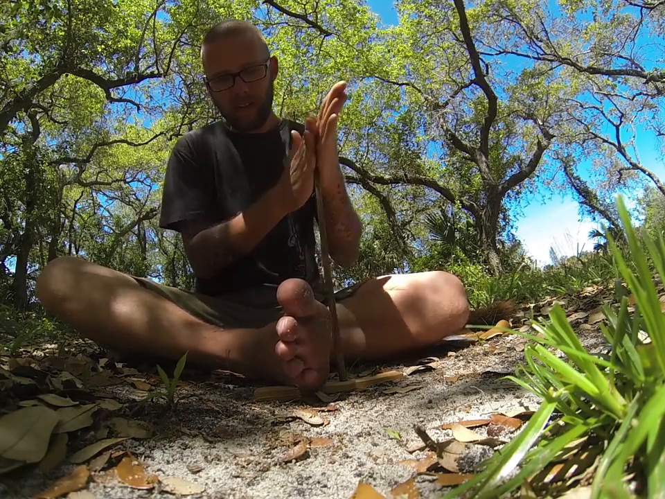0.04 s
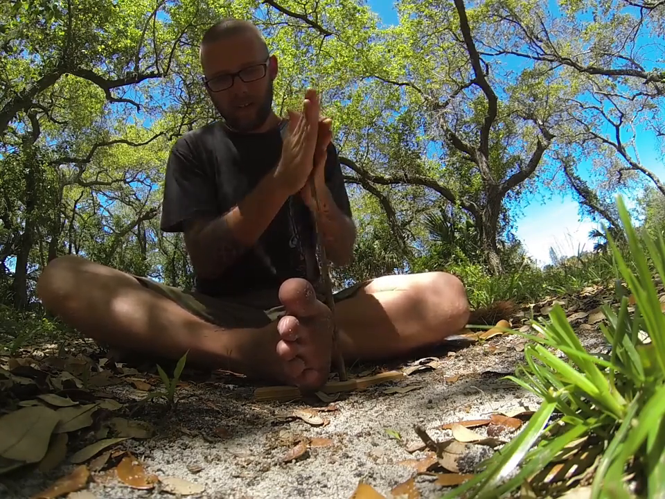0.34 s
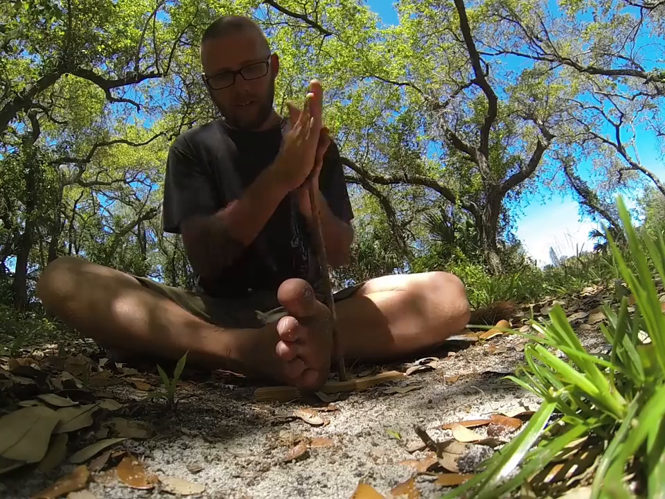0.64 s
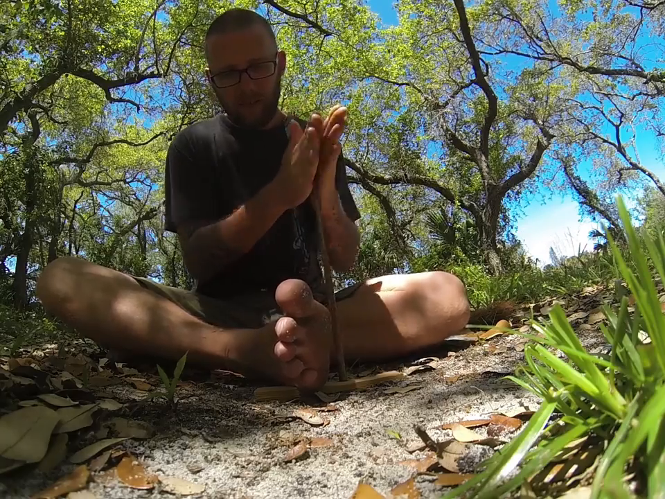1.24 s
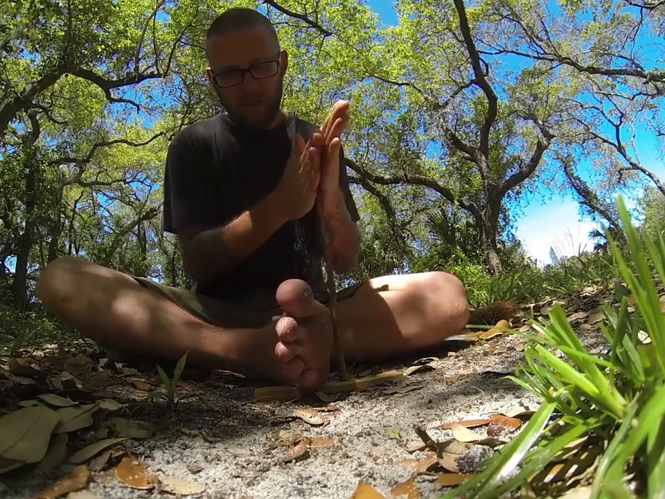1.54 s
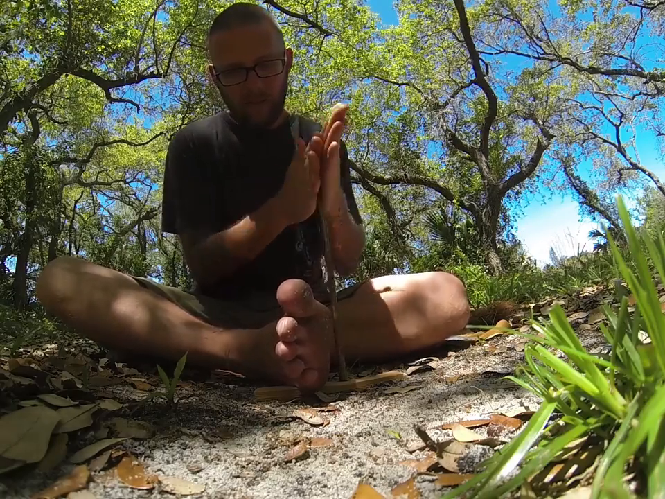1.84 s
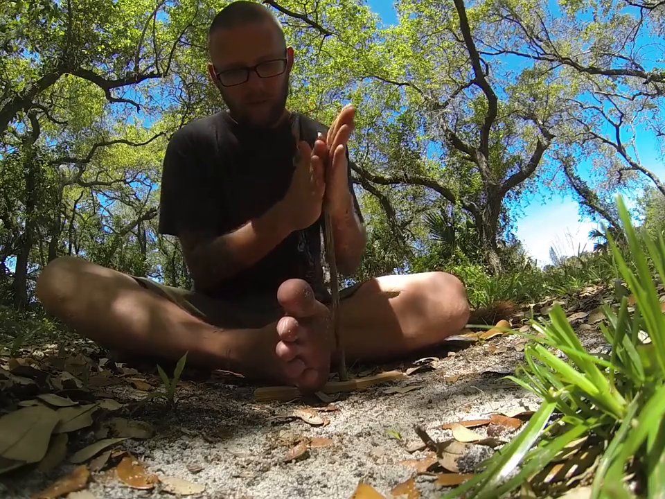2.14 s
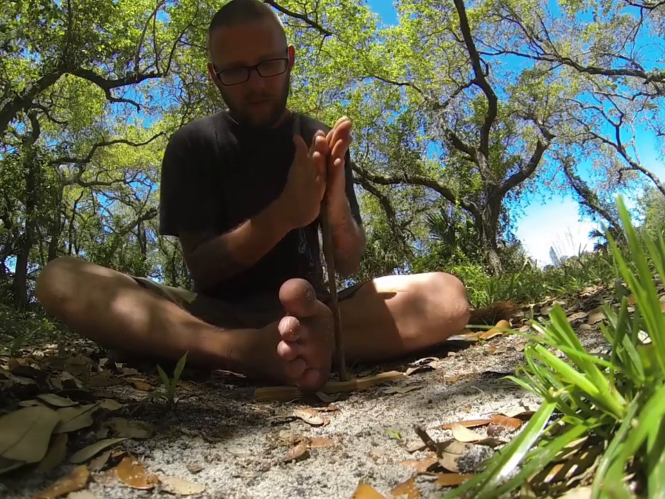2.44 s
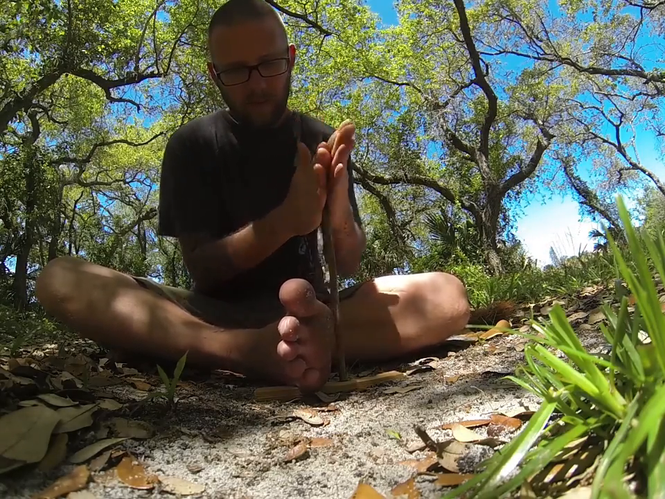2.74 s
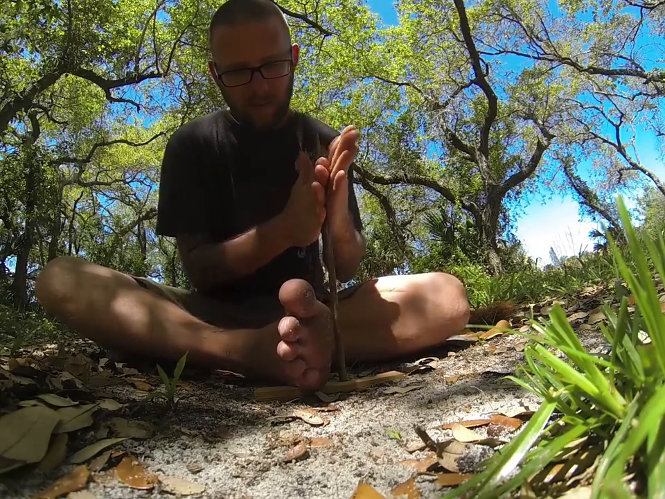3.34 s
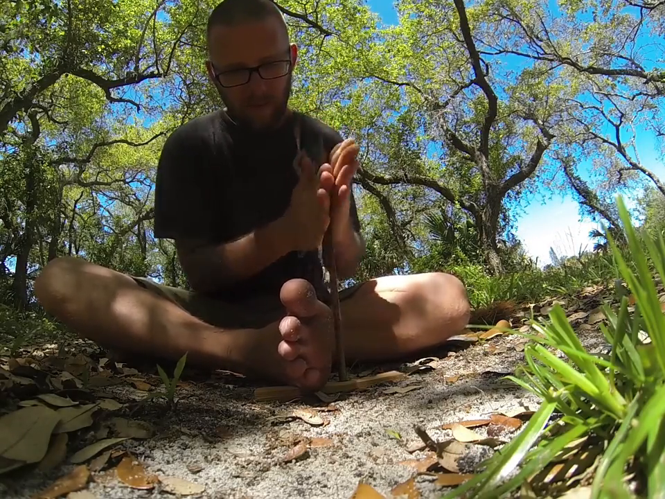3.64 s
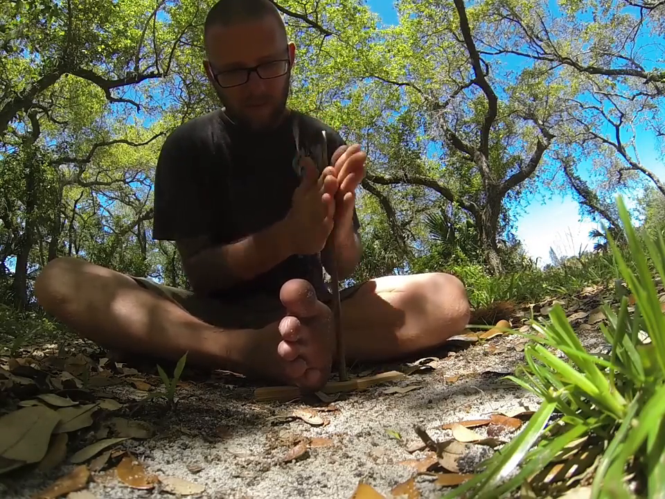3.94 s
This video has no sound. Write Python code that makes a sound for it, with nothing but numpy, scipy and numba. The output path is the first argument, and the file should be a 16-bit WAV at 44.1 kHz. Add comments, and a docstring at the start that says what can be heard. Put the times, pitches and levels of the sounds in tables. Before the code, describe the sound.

A wooden spindle is rolled between palms, about six strokes a second, its tip grinding against wood. Skin hisses with each pass, with small chirps and ticks. Close by, outdoors, a light breeze rumbles on the microphone.

```python
"""Outdoors, a hand drill: two palms roll a thin wooden spindle to and fro, about six strokes a second.
The palms hiss as they slide over each other. The tip grinds in its socket and makes the wood ring.
Now and then the tip catches with a chirp, and the spindle ticks in the socket as it turns round.
A light breeze rumbles on the microphone over a distant hush."""
import sys
import numpy as np
from scipy import signal
from scipy.fft import rfft, irfft
from scipy.io import wavfile
from scipy.ndimage import uniform_filter1d
from numba import njit

SR = 44100
rng = np.random.default_rng(int(sys.argv[2]) if len(sys.argv) > 2 else 0)


def wav_record(signal):
    """Record a signal, one row per channel, as 16-bit PCM in the file named by sys.argv[1]."""
    frames = np.transpose(np.atleast_2d(signal))
    bounded = np.clip(frames, -1, 1)
    # unit amplitude maps onto the largest positive 16-bit level
    quanta = np.round(bounded * 32767).astype(np.int16)
    wavfile.write(sys.argv[1], SR, quanta)


N = 176400
T = np.arange(N) / SR

# Each pass of the palms. Levels compare one stroke with another; drilling() balances the sounds.
# start_s, stop_s, speed_up_share, peak_sharpness, palm_db, spindle_db, upper_db, socket_db, board_db,
# spindle_pitch_hz, upper_pitch_hz (both before any bending of pitch)
STROKES = [(-0.118, 0.087, 0.67, 1.16, -43.5, -50, -55, -56, -61, 3030, 4250),
           (0.063, 0.295, 1, 0.94, -44, -51, -50, -56, -63, 2590, 3720),
           (0.283, 0.468, 0.55, 0.31, -43.5, -50.6, -52, -60, -63, 2700, 3570),
           (0.471, 0.648, 0.64, 0.94, -45, -47.5, -49.5, -56, -60.5, 2500, 3830),
           (0.64, 0.837, 0.6, 1.16, -42.5, -45, -63, -54.5, -63.2, 2640, 4030),
           (0.83, 1.033, 0.65, 1.5, -40, -45.0, -60, -49.5, -57.5, 2690, 4150.0),
           (1.022, 1.178, 0.62, 0.69, -43.1, -47.5, -55, -53, -63, 2720, 4300),
           (1.163, 1.338, 0.77, 1.17, -43.5, -48, -51.5, -52.5, -60.7, 2490, 4260),
           (1.34, 1.501, 0.63, 0.99, -43.5, -48.5, -49, -52.5, -60.5, 2660, 4340),
           (1.488, 1.681, 0.7, 1.3, -44, -51, -47.5, -49.5, -60.5, 2690, 4400),
           (1.682, 1.828, 0.61, 0.44, -44, -49.3, -47.5, -55, -61.5, 2660, 4550),
           (1.826, 2.015, 0.61, 1.28, -45.5, -55, -47.5, -50, -58.5, 2800, 3700),
           (2.01, 2.166, 0.67, 0.87, -43.5, -52.5, -44, -53, -59, 2680, 3760),
           (2.168, 2.335, 0.79, 0.88, -46.0, -53.5, -46, -53.5, -60.5, 2940.0, 3780),
           (2.332, 2.488, 0.65, 0.81, -44, -50.8, -50.5, -57.9, -67.5, 2810, 3640),
           (2.478, 2.626, 0.69, 0.75, -45, -53.5, -44.5, -55, -61, 2870.0, 3770),
           (2.634, 2.775, 0.77, 0.66, -43.5, -50.5, -51, -61.5, -70, 2750, 3670),
           (2.771, 2.921, 0.66, 1.0, -44.5, -50.5, -47, -57.5, -62, 2790, 3760),
           (2.923, 3.062, 0.77, 0.77, -44, -47.1, -48, -59, -62.5, 2550, 3840),
           (3.054, 3.221, 0.6, 1.25, -43.5, -47.8, -44.5, -55.6, -58.5, 2740, 4070),
           (3.213, 3.364, 0.63, 0.57, -45, -48, -48, -61.5, -65.5, 2590, 3900),
           (3.364, 3.546, 0.59, 1.32, -44.2, -51, -46, -55.4, -60, 2700, 4240),
           (3.529, 3.684, 0.61, 0.87, -44, -51, -48, -59.2, -65, 2610, 4190.0),
           (3.665, 3.824, 0.61, 1.1, -44.5, -50.9, -47.5, -51, -61.5, 2520, 3840),
           (3.81, 3.996, 0.67, 1.33, -44.5, -52.5, -46.5, -52.5, -62.5, 2530, 3920)]
# The tone of skin sliding on skin: frequency_hz, level_db
SKIN_TONE = [(400, -12.5), (1200, -10), (2400, -1), (3300, -1.5), (4300, -5), (5600, -3), (7200, -2.5),
             (8800, 0), (11500, 3.1), (12800, -0.5), (14300, -3.5), (16000, -12)]
# The notes the wood rings at, before any bending of pitch: pitch_hz, width_hz, level_db
SPINDLE_RINGS = [(2560, 250, -7.5)]
UPPER_RINGS = [(3747, 140, -2.5), (4574, 350, -5)]
SOCKET_RINGS = [(1718, 200, -1.5), (2050, 220, -4)]
BOARD_RINGS = [(706, 170, -4.5), (1036, 240, -4), (1350, 240, -11)]
# The board's lowest note grows as the hands bear down: time_s, gain_db
THRUM_GROWTH = [(0, -19), (2.1, -12.5), (2.8, -1.5), (4, -1)]
# The strength of the breeze: time_s, level_db
GUSTS = [(0.0, -49.5), (0.43, -45), (0.48, -34), (0.59, -49), (0.89, -31), (0.95, -44), (1.36, -28),
         (1.75, -36.5), (2.09, -30), (2.23, -45), (2.37, -37.5), (2.67, -49.5), (2.71, -38), (3.1, -35),
         (3.53, -46.5), (3.74, -31), (3.98, -44.5), (4.0, -52)]
# The tone of the breeze and of the distant hush: frequency_hz, level_db
BREEZE_TONE = [(15, 3.5), (24, 1.5), (36, -6), (50, -6), (75, -21.5), (105, -19), (150, -38), (300, -51.5),
               (600, -77)]
HUSH_TONE = [(60, 9.5), (130, 11), (235, 9), (320, 0.5), (600, -0.5), (950, 0), (1600, -5), (3000, -10),
             (6000, -13.5), (12000, -15.5), (16000, -20.5)]
# The tip catches (narrow ones chirp, wide ones creak): time_s, level_db, pitch_hz, width_hz
TIP_CATCHES = [(0.19, -44, 1970, 201), (.316, -48.5, 3510, 250), (.559, -47, 2510, 150),
               (0.945, -46, 2560, 121), (.964, -46, 1946, 200), (1.111, -46, 2650, 120),
               (1.14, -44.5, 2606, 120), (1.185, -58, 3420, 700), (1.289, -49.5, 1843, 248.6),
               (1.409, -49, 1820, 250), (1.454, -40, 2540, 150), (1.588, -48, 962, 120),
               (1.636, -48, 2780, 149), (1.913, -50, 1790, 300), (2.245, -50, 1370, 887),
               (2.547, -44.5, 1650, 1120), (2.563, -42, 3700, 150), (2.590, -46.5, 2897, 150),
               (2.732, -47, 4250, 300), (2.835, -48, 1764, 1070), (3.111, -47.5, 2470, 203),
               (3.444, -50, 1685, 1090), (3.731, -50, 1420, 300)]
# The spindle knocks in its socket: time_s, strength_db
SPINDLE_TICKS = [(.291, -31), (.648, -32.5), (.664, -45), (1.0286, -35), (1.183, -46), (1.2076, -37.5),
                 (1.3504, -36), (1.354, -39.5), (1.6774, -37), (1.6931, -38), (1.8579, -38),
                 (1.9885, -32.5), (2.0138, -42), (2.6477, -31.5), (2.929, -37), (2.9438, -36), (3.215, -35),
                 (3.2277, -33), (3.5275, -35.5), (3.5324, -40), (3.8436, -33.5), (3.8485, -37),
                 (3.976, -46)]
# The notes that a tick sets ringing: pitch_hz, width_hz, level_db
TICK_RINGS = [(1290, 360, -10.5), (2180, 600, -9), (3200, 520, -16.5), (4200, 360, -13), (6760, 520, -24),
              (9200, 1130, -3.5), (11700, 900, -22), (13100, 530, -14), (14000, 520, -24)]


def from_db(db):
    """Turn decibels into a number to multiply by."""
    return 10 ** (np.asarray(db) / 20)


def rms_one(x):
    """Scale a signal so that its average level (rms) is 1."""
    return x / np.sqrt(np.mean(x ** 2) + 1e-20)


def drift(rate_hz):
    """A smooth random wobble, about 1 in size."""
    r = np.exp(-2 * np.pi * rate_hz / SR)
    return rms_one(signal.lfilter([1], [1, -2 * r, r * r], rng.standard_normal(N + SR))[SR:])


def coloured(x, tone):
    """Set the balance of lows and highs from a tone table; the result has level 1."""
    hz, db = np.transpose(tone)
    freqs = np.maximum(np.arange(N // 2 + 1) * SR / N, 1)
    gain = from_db(np.interp(np.log(freqs), np.log(hz), db))
    bass_cut = np.minimum(freqs / hz[0], 1) ** 2
    return rms_one(irfft(rfft(x) * gain * bass_cut, N))


@njit
def resonate(push, angle, fade):
    """A vibration: each sample it turns by an angle, fades a little and takes a new push."""
    out, state = np.zeros(len(push)), 0j
    for i in range(len(push)):
        state = state * fade * np.exp(1j * angle[i]) + push[i]
        out[i] = state.real
    return out * (1 - fade)


def resonance(push, hz, width_hz):
    """Ring at a pitch that may move; a narrower width rings longer."""
    return resonate(push, 2 * np.pi * hz / SR * np.ones(N), np.exp(-np.pi * width_hz / SR))


def friction(rough_db, rough_hz, slips_per_s=14000, spread_db=2):
    """Rubbing is a stream of tiny slips, uneven in size, that come in clumps."""
    slips = (rng.random(N) < slips_per_s / SR) * rng.choice([-1, 1], N)
    sizes = from_db(spread_db * np.minimum(rng.exponential(1, N), 4))
    clumps = from_db(rough_db * drift(rough_hz))
    return slips * sizes * clumps


def stroke_speeds(smooth_s=.013):
    """Each stroke (one row) speeds up and slows to rest; the weight of the hands rounds off its ends."""
    rows = []
    for start, stop, speed_up_share, sharpness, *_ in STROKES:
        fastest_s = start + np.clip(speed_up_share, .45, .68) * (stop - start)
        progress = np.interp(T, [start, fastest_s, stop], [0, .5, 1])
        rows.append(np.abs(np.sin(np.pi * progress)) ** max(sharpness, .5))
    return np.abs(uniform_filter1d(np.array(rows), size=int(smooth_s * SR), axis=1))


def swell(speeds, levels_db, power):
    """Loudness follows speed; a higher power gives a shorter, sharper swell."""
    return from_db(levels_db) @ speeds ** power


def palm_hiss(wander_share=.022, flicker_db=4.5):
    """Skin rubs on skin, while hollows between the palms ring, shift and fade."""
    hollows = 0
    for hz in np.geomspace(3800, 13500, num=26):
        hollow = resonance(rng.standard_normal(N), hz * (1 + wander_share * drift(11.8)), width_hz=190)
        hollows = hollows + from_db(flicker_db * drift(22)) * hollow
    rubbing = rms_one(friction(rough_db=1.36, rough_hz=100))
    return coloured(rubbing + .84 * rms_one(hollows), SKIN_TONE)


def rubbed_wood(rings, bend, rough_db, rough_hz=130, flicker_db=2):
    """The grinding tip makes the wood ring; each note swells and fades as the contact shifts."""
    out = 0
    for hz, width_hz, db in rings:
        level = from_db(db + flicker_db * drift(28))
        out = out + level * resonance(friction(rough_db, rough_hz), hz * bend, width_hz)
    pitches = [hz * bend for hz, _, _ in rings]
    band_hz = [.87 * min(map(np.min, pitches)), 1.1 * max(map(np.max, pitches))]
    return rms_one(signal.sosfilt(signal.butter(2, band_hz, "band", fs=SR, output="sos"), out))


def drilling(spindle_sag=.21, socket_sag=.45, climb_per_s=.24, grip_wander=.04):
    """Palms and wood get louder with speed, while the spindle and socket sag in pitch."""
    start, stop, _, _, *levels_db, spindle_hz, upper_hz = np.transpose(STROKES)
    palm_db, spindle_db, upper_db, socket_db, board_db = levels_db
    speeds = stroke_speeds()
    slowness = 1 - speeds.max(axis=0)
    stroke = np.searchsorted(stop[:-1], T)  # which stroke each sample is in
    climb = climb_per_s * (T - (start + stop)[stroke] / 2)  # the pitch rises through each stroke
    bend = 1 + spindle_sag * slowness ** 2 + climb + grip_wander * drift(19.4)
    # The grip retunes one spindle note and one upper note on every stroke.
    spindle = rubbed_wood([(spindle_hz[stroke], 150, 0), *SPINDLE_RINGS], bend, rough_db=2.5)
    upper = rubbed_wood([(upper_hz[stroke], 140, 0), *UPPER_RINGS], bend=.98, rough_db=3.5)
    socket = rubbed_wood(SOCKET_RINGS, bend=1 + socket_sag * slowness, rough_db=4)
    board = rubbed_wood(BOARD_RINGS, bend=1, rough_db=5, rough_hz=125)
    thrum = rubbed_wood([(445, 190, 0)], bend=.96, rough_db=4, rough_hz=100)  # the board's lowest note
    thrum *= from_db(np.interp(T, *np.transpose(THRUM_GROWTH)))
    creep = from_db(palm_db.mean()) * .12 ** 2.32  # the palms still slide a little as they turn round
    return ((swell(speeds, palm_db - 2, power=2.32) + creep) * palm_hiss()
            + swell(speeds, spindle_db - 3.5, power=1.74) * spindle
            + swell(speeds, upper_db - 5, power=4.45) * upper
            + swell(speeds, socket_db - 2.5, power=4.5) * socket
            + swell(speeds, board_db - 4.5, power=3.7) * board
            + swell(speeds, board_db, power=7) * thrum)


def breeze_rumble():
    """Gusts of air push on the microphone and make a low rumble."""
    strength = from_db(np.interp(T, *np.transpose(GUSTS)))
    return strength * coloured(rng.standard_normal(N), BREEZE_TONE)


def distant_hush(level_db=-62):
    """The faint, steady noise of the open air."""
    return from_db(level_db) * coloured(rng.standard_normal(N), HUSH_TONE)


def catches(half_length_s=.0032):
    """The tip sticks and slips for an instant: a chirp, or a dry creak when its pitch scatters."""
    out = 0
    for time_s, db, hz, width_hz in TIP_CATCHES:
        stray_phase = np.cumsum(rng.standard_normal(N)) * np.sqrt(np.pi * width_hz / SR)
        smoothing = signal.butter(2, width_hz, fs=SR, output="sos")
        scatter = signal.sosfilt(smoothing, np.exp(1j * stray_phase))
        chirp = rms_one((scatter * np.exp(2j * np.pi * hz * T)).real)
        burst = np.exp(-((T - time_s) / half_length_s) ** 2)
        out = out + from_db(db) * burst * chirp
    return out


def ticks(fade_s=.0012, gain_db=4.5):
    """As the spindle turns round, a very short crunch in the socket rings its high notes."""
    force = sum(from_db(db + gain_db) * (T >= time_s) * np.exp(-np.abs(T - time_s) / fade_s)
                for time_s, db in SPINDLE_TICKS)
    crunch = force * rng.choice([-1, 1], N)
    return 2 * sum(from_db(db) * resonance(crunch, hz, width_hz) for hz, width_hz, db in TICK_RINGS)


def scene():
    """The drill close by in the open air, on one channel."""
    return (drilling() + catches() + ticks() + breeze_rumble() + distant_hush())[None]


def record(dry):
    """Cut away the very highest treble, above 16100 Hz."""
    return signal.sosfilt(signal.ellip(12, .1, 80, 16100, fs=SR, output="sos"), dry)


dry = scene()
out = record(dry)
wav_record(out)
```